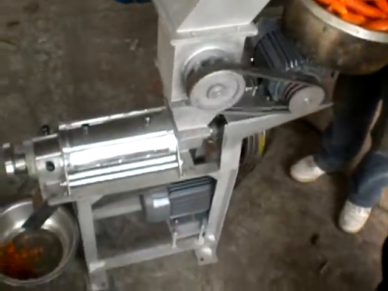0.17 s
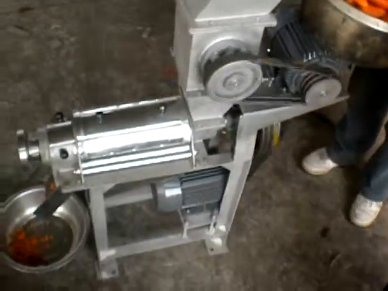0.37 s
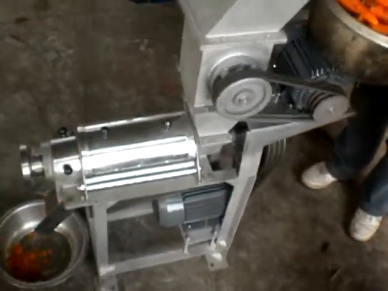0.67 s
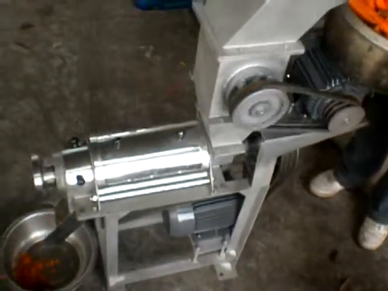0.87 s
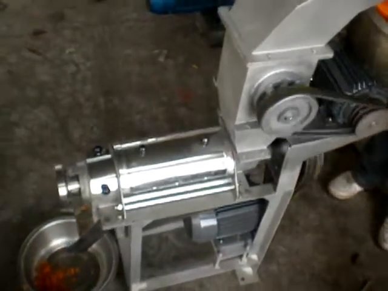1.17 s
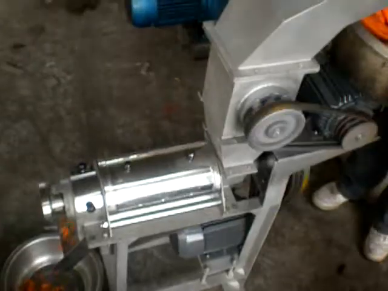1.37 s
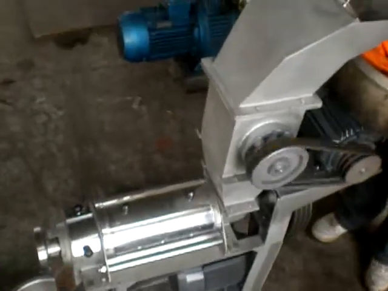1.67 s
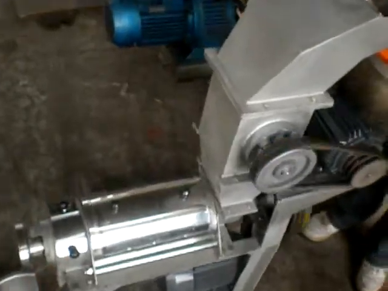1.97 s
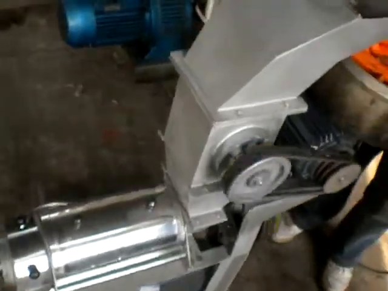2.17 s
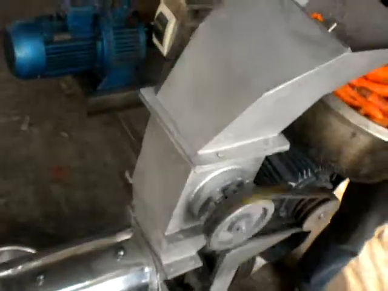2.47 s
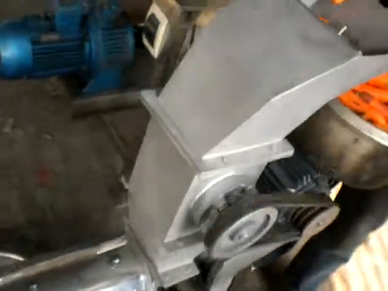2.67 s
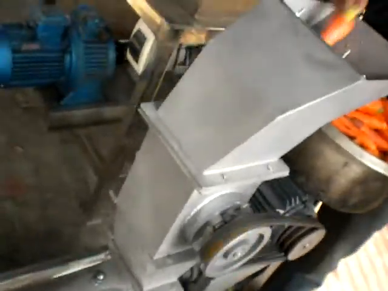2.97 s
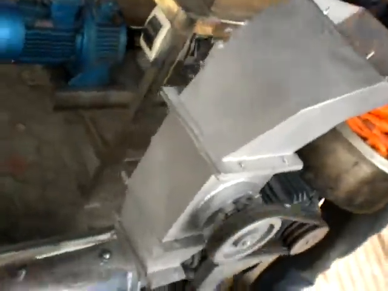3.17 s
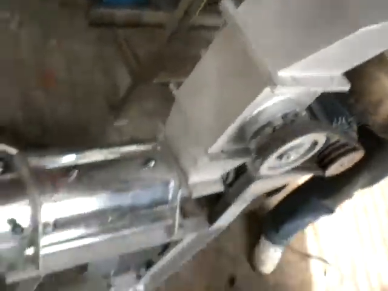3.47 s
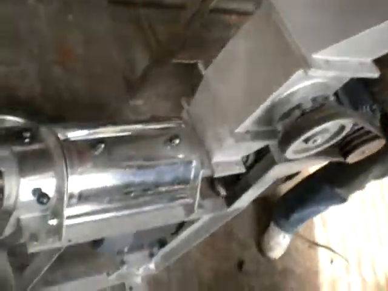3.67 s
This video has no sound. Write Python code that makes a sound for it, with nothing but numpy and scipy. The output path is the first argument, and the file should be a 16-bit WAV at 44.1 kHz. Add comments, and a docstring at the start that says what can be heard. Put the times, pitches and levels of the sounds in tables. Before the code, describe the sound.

A juicing machine crushes carrots with a dense, steady roar and irregular hollow knocks.

```python
"""Juicer crushing carrots

A belt-driven crusher and screw juicer chews carrots in a workshop, heard from close by.
Pieces pelt the steel housing in a dense roar over a motor hum. The blades shred, pieces squeak,
and the drive rasps for a while. Big chunks knock on the housing; the hardest knocks overload
the recorder and make its limiter (an automatic volume control) briefly turn everything down."""
import sys
import numpy as np
from scipy import signal
from scipy.fft import rfft, irfft
from scipy.io import wavfile
from scipy.ndimage import uniform_filter1d, minimum_filter1d

SR = 44100
rng = np.random.default_rng(int(sys.argv[2]) if len(sys.argv) > 2 else 0)


def master_out(mix):
    """Clip the mix to full scale and print it as 16-bit PCM to the path in sys.argv[1]."""
    frames = np.transpose(np.atleast_2d(mix))
    ceiling = np.clip(frames, -1, 1)
    pcm = np.round(ceiling * 32767).astype(np.int16)
    wavfile.write(sys.argv[1], SR, pcm)


N = 168462
T = np.arange(N) / SR
HZ = np.fft.rfftfreq(N, 1 / SR)

# Loudness as the microphone moves along the machine. Each row: time in seconds, then levels in dB
# of the housing's low, middle and high ringing and of the shredding.
LEVELS = [(0, -24.5, -20.5, -18.5, -30.5), (.4, -26.5, -17.5, -19.5, -30.5), (.75, -26, -21, -18, -28),
          (1.0, -27, -23.5, -20, -29.5), (1.3, -29, -20.5, -19, -31), (1.44, -25, -22, -17, -32),
          (1.52, -25, -21.5, -20.5, -31.5), (1.75, -27, -18, -18.5, -29.5), (1.95, -23, -16, -21.5, -27),
          (2.22, -24.5, -21.5, -17, -23.5), (2.45, -29, -18, -19.5, -27), (2.7, -26, -19, -22, -26.5),
          (2.97, -25.5, -18, -18.5, -22), (3.2, -30.5, -17, -19, -27.5), (3.45, -28, -18.5, -20.5, -28),
          (3.82, -30.5, -19, -22, -25.5)]


def crusher():
    """Pieces pelt the housing and make it ring. The roar changes as the microphone moves."""
    move_start_s, move_end_s = 2.7, 2.9
    low_edge_hz, high_edge_hz = 492, 847
    hits = workshop_echo(pelting(per_s=900, spread_db=3.5, share=.55))
    moved = np.clip((T - move_start_s) / (move_end_s - move_start_s), 0, 1)
    at_press = colour(hits, housing_gain())
    at_hopper = colour(hits, housing_gain(beside_hopper=True))
    spectrum = rfft((1 - moved) * at_press + moved * at_hopper)
    low = 1 / (1 + (HZ / low_edge_hz) ** 10)
    high = 1 - 1 / (1 + (HZ / high_edge_hz) ** 10)
    return sum(evened(irfft(spectrum * band, N)) * curve(LEVELS, column)
               for column, band in enumerate([low, 1 - low - high, high], start=1))


def housing_gain(beside_hopper=False):
    """How strongly the steel housing sounds at each pitch, beside the screw press or the hopper."""
    # The steel's ringing notes. Each row: pitch in Hz, width in Hz, level in dB beside the press,
    # level in dB beside the hopper.
    notes = [(232.6, 5.7, -13.5, -5.5), (288, 27, -7.5, -6.5), (328, 18, -7.5, -11.5), (359.7, 20, -2, -3),
             (395.5, 21, -5, -8.5), (530, 54, -2.5, 2.5), (588, 43, -1.5, 1.5), (643, 15, -3.5, 1),
             (717.5, 58, 2, 3), (841, 72, -6, 1.5), (990.4, 97, 2, -2), (1133, 62, -7.5, 5),
             (1268, 81, -6, -12), (1355, 99, -4, -2.5)]
    # How well the steel passes sound to the air. Each row: frequency in Hz, gain in dB.
    radiation = [(20, -36), (90, -27), (160, -8.5), (250, 0), (450, -0.5), (700, 2), (1400, 4), (1800, 4.5),
                 (2600, -9.5), (4000, -28)]
    return resonances(notes, column=3 if beside_hopper else 2) * shape(radiation)


def knocks():
    """Big chunks thud and leave the housing ringing. The hardest knocks overload the recorder,
    heard as a bright distortion crackle and a low thump that grow with the knock's level."""
    # Chunks hitting the housing. Each row: start in seconds, level in dB, pitch in Hz.
    chunks = [(.4215, 5, 890), (.4875, 12.5, 690), (.496, -1, 720), (.589, -3.5, 1000), (1.3818, -9, 860),
              (1.5628, 13.5, 757), (1.631, 1, 840), (2.123, -3, 770), (2.186, 8, 740), (2.2936, 17, 752),
              (2.488, 0.5, 670), (2.527, 2.5, 677), (2.6285, -2.5, 696), (2.7492, 5.5, 660),
              (3.029, 4.5, 706), (3.080, -0.5, 610), (3.1805, 5, 651), (3.329, 10.5, 704),
              (3.558, -3.5, 600)]
    rise_s, ring_db, ring_fade_s = .0019, -16.5, .21  # the ring fades by 60 dB in this time
    crackle_hz, crackle_width_hz, crackle_db, thump_db = 3820, 920, -39.5, -53.5
    body, overload = np.zeros(N), np.zeros(N)
    t = T[:SR // 4]
    rise = t / rise_s
    contact = (rise * np.exp(1 - rise)) ** 3  # one short, smooth pulse
    hollow = shape([(200, -16), (450, -1.5), (720, 3.5), (1100, -1), (1600, -19), (3000, -25.5)])
    ringing = colour(rng.standard_normal(N), housing_gain() * hollow)
    ring_level = (1 - np.exp(-(rise / 2) ** 2)) * amp(ring_db - 60 * t / ring_fade_s)
    for start, db, hz in chunks:
        thud = contact * np.sin(2 * np.pi * hz * t)
        ring = np.roll(ringing, rng.integers(N))[:len(t)] * ring_level
        add(body, start, amp(db) * (thud + ring))
        add(overload, start, amp(db) ** 2 * contact)
    crackle = colour(rng.standard_normal(N), 1 / (1 + (2 * (HZ - crackle_hz) / crackle_width_hz) ** 2))
    bass_cut = signal.butter(2, 278, "highpass", fs=SR, output="sos")
    return signal.sosfilt(bass_cut, body) + overload * (amp(crackle_db) * crackle + amp(thump_db))


def shredding():
    """The blades tear the pulp with a fine, flickering crackle."""
    # The crackle's tone. Each row: frequency in Hz, relative level in dB.
    crackle_tone = [(1000, -20.5), (1600, 0), (2000, -1.5), (2400, 2), (3000, -4.5), (3750, -11.5),
                    (4300, -20.5), (4700, -26)]
    tears = pelting(per_s=2500, spread_db=3, share=.52) * amp(1.7 * wander(rate_hz=68))
    return colour(tears, shape(crackle_tone)) * curve(LEVELS, column=4)


def squeaks():
    """Pieces drag on the steel or are crushed against it, in brief bursts."""
    # Squeaks and crunches. Each row: start and length in seconds, pitch and width in Hz, level in dB.
    bursts = [(1.018, 0.022, 3760, 1000, -23.5), (1.087, 0.069, 1160, 603, -13.5),
              (1.324, 0.027, 3150, 250, -23), (1.375, 0.04, 1126, 810, -10.5),
              (2.066, 0.024, 2340, 350, -23), (2.521, .035, 720, 251, -9), (3.115, 0.032, 2240, 1400, -17),
              (3.63, 0.1, 873, 130, -14.5)]
    out = np.zeros(N)
    for start, length, hz, width, db in bursts:
        fade = np.hanning(round(length * SR))
        rub = colour(rng.standard_normal(N), 1 / (1 + (2 * (HZ - hz) / width) ** 4))
        add(out, start, amp(db) * fade * evened(rub[:len(fade)]))
    return out


def rasp():
    """Metal rubs with a bright rasp that swells once in every turn of the drive."""
    # The rubbing metal's notes. Each row: pitch in Hz, width in Hz, relative level in dB.
    notes = [(2450, 160, -8), (3130, 75, -2.5), (3260, 100, -2), (3370, 97, -3.5), (3290, 50, -2),
             (3563, 61, 3), (3730, 90, 1), (4336, 150, -8.5)]
    # The rasp's loudness. Each row: time in seconds, level in dB.
    loudness = [(0, -40.5), (.27, -37.5), (.55, -38.5), (.85, -31.5), (1.29, -26), (1.42, -33),
                (1.6, -36.5), (2.0, -47.5)]
    turns_per_s, swing_db = 45, 2.5
    turns = np.cumsum(turns_per_s * (1 + .03 * wander(rate_hz=8))) / SR
    swell = amp(swing_db * np.cos(2 * np.pi * turns))
    rub = pelting(per_s=550, spread_db=6, share=.7) * swell
    brightness = shape([(1000, -12), (2500, -1.5), (4400, -2.5), (4900, -8)])
    return colour(rub, resonances(notes) * brightness) * curve(loudness)


def motors():
    """The motors hum, wavering with the load, over a faint rumble."""
    # The hum's tones. Each row: pitch in Hz, level in dB.
    tones = [(362, -43), (716, -32)]
    pitch_waver, flutter_db, rumble_db = .008, 2.5, -66
    motor_time = np.cumsum(1 + pitch_waver * wander(rate_hz=12.8)) / SR
    hum = np.zeros(N)
    for hz, db in tones:
        level = amp(db + flutter_db * wander(rate_hz=22))
        hum += level * np.sqrt(2) * np.sin(2 * np.pi * hz * motor_time)
    rumble_tone = shape([(15, 10), (60, -6.5), (105, 6.5), (200, .5), (500, -28.5)])
    return hum + amp(rumble_db) * colour(rng.standard_normal(N), rumble_tone)


def workshop_echo(x):
    """The room adds a short, blurred echo."""
    fade_s, echo_db = .2, -8.5
    t = T[:SR // 2]
    tail = rng.standard_normal(len(t)) * amp(-60 * t / fade_s) * (t > .005)
    echo = signal.fftconvolve(x, tail / np.linalg.norm(tail))[:N]
    return evened(x + amp(echo_db) * echo)


def pelting(per_s, spread_db, share):
    """Random hits of uneven size carry a share of the power; the rest is a wash of tiny ones."""
    size = amp(spread_db * np.minimum(rng.exponential(1, N), 4))
    hits = size * rng.choice([-1, 1], N) * (rng.random(N) < per_s / SR)
    return np.sqrt(share) * evened(hits) + np.sqrt(1 - share) * rng.standard_normal(N)


def resonances(rows, column=2):
    """Gain at each frequency for a set of ringing notes, one peak per row."""
    return np.sqrt(sum(amp(row[column]) ** 2 / (1 + (2 * (HZ - row[0]) / row[1]) ** 2) for row in rows))


def colour(x, gain):
    """Filters a sound by a gain at each frequency, then sets its average level to 1."""
    cepstrum = irfft(np.log(np.maximum(gain / gain.max(), 1e-5)), N)
    # Folding onto the first half makes the ringing follow each hit, never lead it.
    cepstrum[1:N // 2] *= 2
    cepstrum[N // 2 + 1:] = 0
    return evened(irfft(rfft(x) * np.exp(rfft(cepstrum)), N))


def shape(points):
    """Gain at each frequency, drawn through (Hz, dB) points."""
    hz, db = np.transpose(points)
    return amp(np.interp(np.log(HZ + 1), np.log(hz), db))


def curve(rows, column=1):
    """Gain over time from one dB column of a table."""
    columns = np.transpose(rows)
    return amp(np.interp(T, columns[0], columns[column]))


def wander(rate_hz):
    """Smooth random drift with a typical size of 1."""
    return evened(irfft(rfft(rng.standard_normal(N)) * np.exp(-(HZ / rate_hz) ** 2) * (HZ > 0), N))


def amp(db):
    """Turns decibels into a gain to multiply by."""
    return 10 ** (np.asarray(db) / 20)


def evened(x):
    """Scales a signal to an average (rms) level of 1."""
    return x / np.sqrt(np.mean(x ** 2) + 1e-20)


def add(mix, start_s, sound):
    """Mixes a sound in at its start time."""
    part = mix[round(start_s * SR):][:len(sound)]
    part += sound[:len(part)]


def scene():
    """The whole machine in mono. Roar and shredding surge together with the uneven feed."""
    surge_db = 1.42
    feed = amp(surge_db * wander(rate_hz=30.3))
    return (feed * (crusher() + shredding()) + rasp() + squeaks() + knocks() + motors())[None]


def record(dry):
    """A limiter dips at hard knocks, peaks overload and treble is cut. A faint high hiss rides on the sound and
    follows its level."""
    limit_db, ratio, recover_db_per_s, look_ahead_s = -2, 3, 105, .002
    input_ceiling, treble_cut_hz, hiss_db, top_hz = 1.03, 4750, -70.5, 15800
    over_db = np.maximum(20 * np.log10(abs(dry[0]) + 1e-9) - limit_db, 0) * (1 - 1 / ratio)
    recovery = T * recover_db_per_s
    dip_db = np.maximum.accumulate(over_db + recovery) - recovery  # dips at once, comes back slowly
    ahead = round(look_ahead_s * SR)
    gain_db = uniform_filter1d(minimum_filter1d(-dip_db, ahead), ahead)
    limited = np.clip(dry[0] * amp(gain_db), -input_ceiling, input_ceiling)
    treble_cut = signal.firwin(161, treble_cut_hz, window=("kaiser", 8), fs=SR)
    dulled = signal.fftconvolve(limited, treble_cut, "same")
    hiss = amp(hiss_db) * dulled * rng.standard_normal(N)
    top_cut = signal.firwin(511, top_hz, window=("kaiser", 9), fs=SR)
    return signal.fftconvolve(np.clip(dulled, -1, 1) + hiss, top_cut, "same")[None]


dry = scene()
out = record(dry)
master_out(out)
```